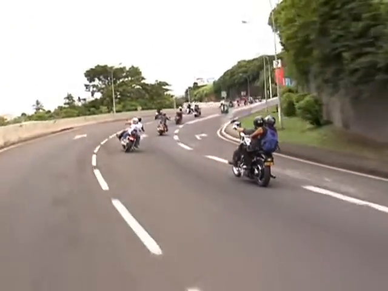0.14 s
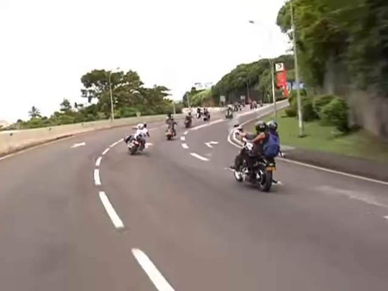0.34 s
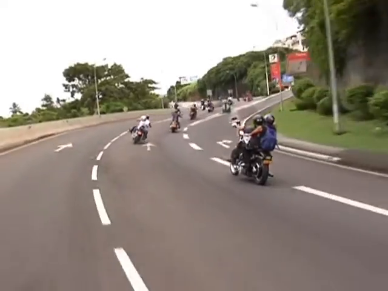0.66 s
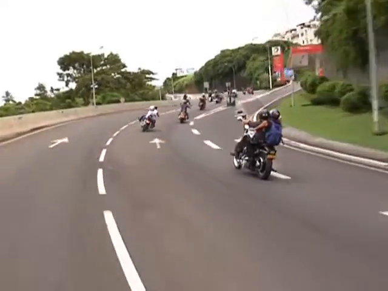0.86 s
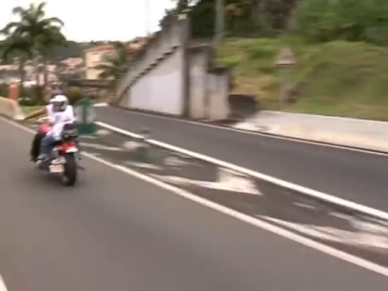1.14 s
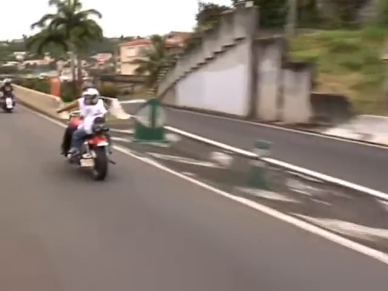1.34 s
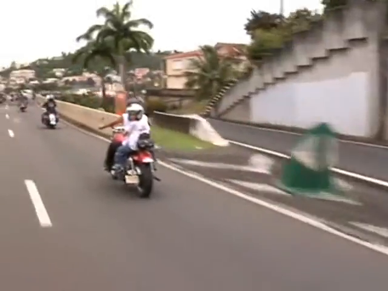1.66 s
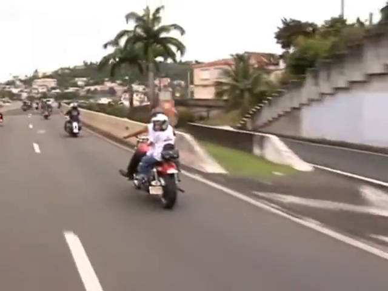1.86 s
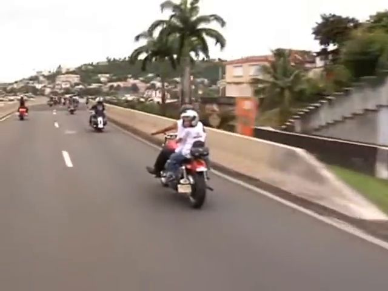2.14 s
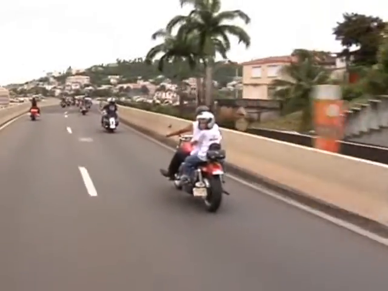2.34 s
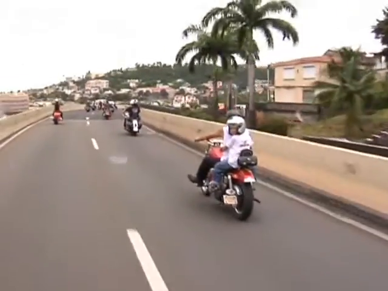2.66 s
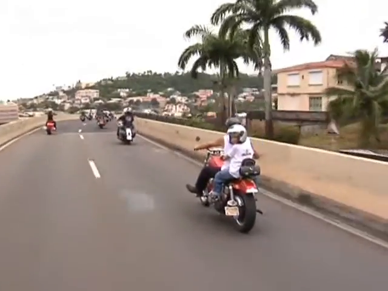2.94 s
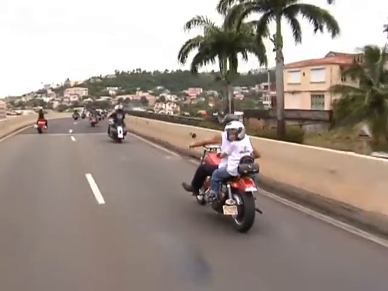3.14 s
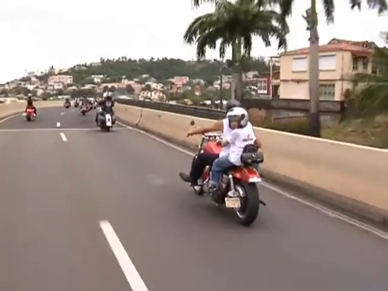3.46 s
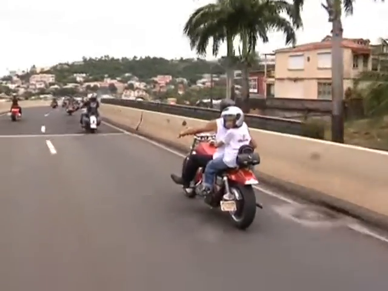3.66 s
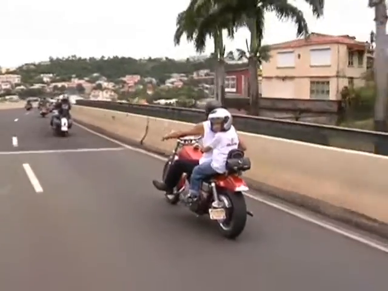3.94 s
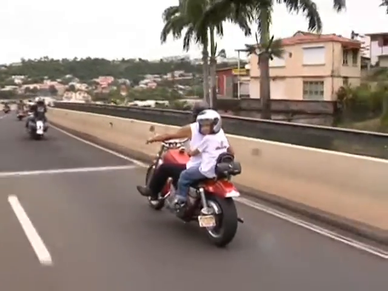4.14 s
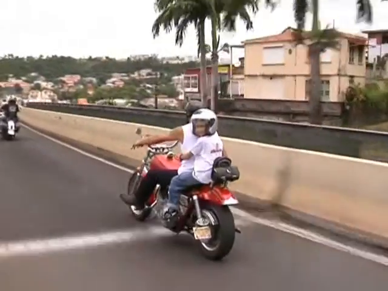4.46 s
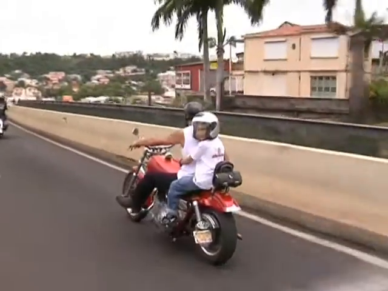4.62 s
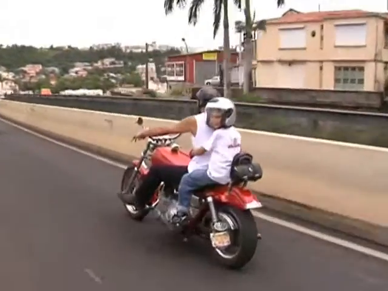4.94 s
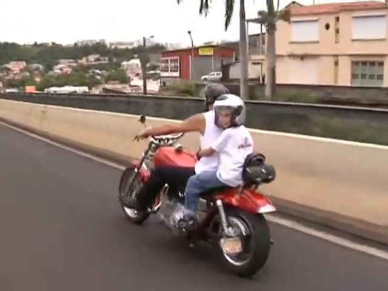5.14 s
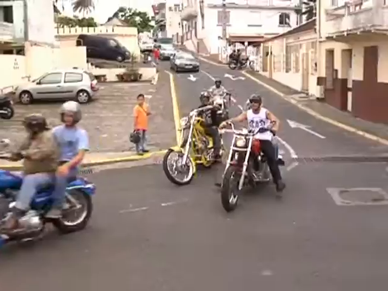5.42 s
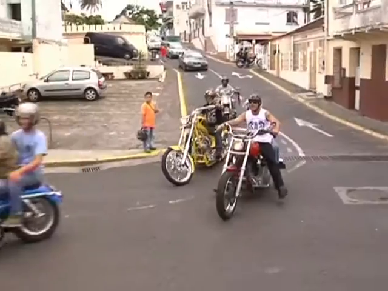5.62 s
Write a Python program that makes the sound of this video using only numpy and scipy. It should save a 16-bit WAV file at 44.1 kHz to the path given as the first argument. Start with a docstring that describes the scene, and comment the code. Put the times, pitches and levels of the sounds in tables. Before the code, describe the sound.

A motorcycle accelerates with a thumping exhaust, cutting to a softer rumble of cruising bikes and wind, then a brief idle.

```python
"""Dull exhaust thumps and their crack off a stone wall: a V-twin motorcycle pulls hard through a bend.
A hard cut drops us into a quiet group cruise, all low rumble, tyre hiss and wind on the microphone.
A second cut lands on engines ticking over at a junction. Each exhaust is a train of unevenly spaced
firings, part pressure pulse and part rushing gas. The bikes play in the right channel only."""
import sys
import numpy as np
from scipy import signal
from scipy.fft import rfft, irfft, next_fast_len
from scipy.io import wavfile
from scipy.ndimage import uniform_filter1d, map_coordinates

SR = 44100
rng = np.random.default_rng(int(sys.argv[2]) if len(sys.argv) > 2 else 0)


def log_audio(samples):
    """Write samples as a 16-bit WAV file to the path given in sys.argv[1]."""
    # one column per channel
    frames = np.atleast_2d(samples).T
    # limit to full scale, then quantise
    limited = np.clip(frames, -1, 1)
    pcm = np.round(limited * 32767).astype(np.int16)
    wavfile.write(sys.argv[1], SR, pcm)


N = 255337

# All levels are relative, ahead of the mix gains.
# wind buffet: (frequency [Hz], level [dB])
BUFFET_SPECTRUM = [(10, -47), (25, -3.5), (60, 1), (100, -1.5), (200, -9.5), (600, -39), (2000, -62)]
# brief low thuds during the cruise: (time [s], level [dB], pitch [Hz])
LOW_THUDS = [(1.241, -26.5, 146), (1.487, -23, 106), (1.852, -21.5, 87), (2.047, -23.5, 107),
             (2.212, -24, 106), (2.796, -28, 104), (2.969, -32, 110), (3.015, -32, 99), (3.154, -28, 94),
             (3.249, -24, 92), (3.307, -31, 102), (3.378, -26.5, 103), (3.699, -23, 112), (3.782, -48, 103),
             (4.081, -24.5, 112), (4.518, -30.4, 170), (4.627, -28, 114), (5.084, -25.5, 132),
             (5.369, -30, 147)]
# tyre hiss: (frequency [Hz], level [dB])
TYRE_SPECTRUM = [(530, -13.5), (900, -2), (1120, -4.5), (1510, -5), (2550, -10.5), (3700, -16.5),
                 (6130, -19.5), (8780, -34.5), (11400, -25), (15800, -59)]
# the clearest ticks of hiss: (time [s], level [dB])
HISS_TICKS = [(1.1977, -47.5), (1.36, -45), (1.4735, -49), (1.5963, -48.5), (1.9964, -52), (2.1321, -54),
              (2.4039, -48), (2.9527, -53), (3.0614, -52), (3.0949, -52.5), (3.2304, -51), (3.4396, -47.5),
              (3.7214, -50), (3.8641, -52), (4.0088, -48.5), (4.9482, -55), (5.1736, -52)]
# bed of idling engines: (frequency [Hz], level [dB])
IDLE_SPECTRUM = [(30, -30), (60, -7), (90, 10), (140, -5), (220, -7), (330, -5), (450, -16.5), (900, -25),
                 (1200, -26), (2500, -33.5), (6000, -39.5), (7500, -50), (12500, -41), (15800, -58)]
# valve ticks of the nearest idling engine, one per firing: (time [s], level [dB])
VALVE_TICKS = [(5.5014, -55), (5.533, -58), (5.5706, -54.5), (5.603, -60), (5.643, -56.5), (5.6757, -56),
               (5.7184, -51), (5.75, -56)]
# the cruising group, one row per bike: (engine cycle rate [Hz], level [dB])
GROUP_ENGINES = [(30.46, -0.5), (24.73, -3.5), (34.59, -1.5)]
# the group's exhaust rumble: (frequency [Hz], level [dB])
RUMBLE_SPECTRUM = [(30, -20), (65, -5.5), (92, -3.5), (125, 0.5), (155, -5), (185, -1), (260, -5),
                   (370, -9), (480, -20), (900, -23), (3000, -65)]
# the nearest cruising bike's burble: (frequency [Hz], level [dB])
BURBLE_SPECTRUM = [(90, -16), (180, -3), (400, 4), (520, 0), (700, -1), (880, -8), (1130, -11.5),
                   (1250, -12.5), (2500, -27.5), (6000, -40)]
# drawing up to that bike: (time [s], distance [m])
NEAR_DISTANCE = [(1.16, 9.8), (3.8, 6.6), (4.4, 6.5), (4.9, 3.47), (5.4, 3.37)]
# the cruising riders feather their throttles: (time [s], level [dB])
CRUISE_THROTTLE = [(1.16, 6.5), (1.3, 6.5), (1.48, 1.5), (1.88, 2.5), (2.25, -1), (3.75, -2.5), (4.3, .5),
                   (4.46, -1.5), (4.53, 2.5), (4.75, 0), (4.92, -3), (5.07, 0.2), (5.24, -1.5), (5.39, 1.2),
                   (5.48, -5.5)]
# the pulling bike's climbing revs: (time [s], engine cycle rate [Hz])
PULL_REVS = [(0, 26.02), (.22, 26.6), (.45, 27.36), (.62, 27.53), (.85, 28.2), (1.16, 28.66)]
# its exhaust's loudness: (time [s], level [dB])
PULL_LEVEL = [(0, -20), (.45, -20.5), (.65, -23), (.87, -23), (1.08, -21), (1.16, -25)]
# the dull body of a firing: (frequency [Hz], level [dB])
THUMP_SPECTRUM = [(25, -58), (90, -14), (190, 1.5), (330, 2.5), (500, -2.5), (700, -4.5), (950, -10.5),
                  (1150, -23), (1600, -20), (3000, -41), (8000, -47)]
# the bright edge of a firing: (frequency [Hz], level [dB])
CRACK_SPECTRUM = [(150, -23), (500, 5), (900, 4.5), (1200, 0), (2400, -3), (3400, -7.5), (4600, -11),
                  (5600, -13), (8000, -23.5), (12000, -22.5), (14000, -28), (16000, -46)]
# accents, where a firing burns harder or softer: (time [s], level [dB])
FIRING_ACCENTS = [(.137, -1.5), (.250, 1), (.509, 1.5), (.620, 3), (.654, 3), (.691, 1), (.727, 3.5),
                  (.777, 3), (.869, 1.5), (1.117, 2)]
# the echo, strongest when the pipes aim squarely at the wall: (time [s], level [dB])
WALL_ECHO_LEVEL = [(0, -12), (.35, -9), (.42, -3), (.525, 1), (.565, -7), (.62, -3.5), (.68, 2), (.76, -1),
                   (.84, 2), (.92, -1.5), (1.0, -11), (1.06, -15), (1.14, 0)]

CRUISE_CUT_S, JUNCTION_CUT_S = 1.161, 5.48
FIRING_GAP_CYCLES = .395  # from the first cylinder to the second


def amp(db):
    """Decibels to gain."""
    return np.exp(np.asarray(db) * (np.log(10) / 20))


def unit(x):
    """Scale to rms 1."""
    return x / np.sqrt(np.mean(x ** 2) + 1e-20)


def clock():
    """The time of each sample, in seconds."""
    return np.arange(N) / SR


def curve(rows):
    """An automation line through (time, value) points."""
    return np.interp(clock(), *np.transpose(rows))


def swell(at_s, width_s):
    """A smooth rise to 1 and fall, centred on a moment."""
    return np.exp(-np.minimum(((clock() - at_s) / width_s) ** 2, 20))


def wobble(rate):
    """A smooth random curve, rate knots a second."""
    steps = np.arange(0, N + 64, 64) / SR
    knots = rng.standard_normal(int(N * rate / SR) + 4)
    return np.interp(clock(), steps, map_coordinates(knots, [steps * rate]))


def noise():
    """White noise."""
    return rng.standard_normal(N)


def filtered(x, response):
    """x through a frequency response."""
    size = next_fast_len(N + SR // 2, real=True)
    return irfft(rfft(x, size) * response(np.fft.rfftfreq(size, 1 / SR)), size)[..., :N]


def colour(x, spectrum):
    """x through an EQ curve of (frequency, level) points, at rms 1."""
    points_hz, db = np.transpose(spectrum)
    return unit(filtered(x, lambda hz: amp(np.interp(np.log(hz + 1), np.log(points_hz), db))))


def resonate(x, hz, width_hz, stages=1):
    """x through a damped mode, once per stage."""
    return filtered(x, lambda f: (1j * f * width_hz / (hz ** 2 - f ** 2 + 1j * f * width_hz)) ** stages)


def delayed(x, ms):
    """x heard over a path whose delay may change."""
    return np.interp(clock() - ms / 1000, clock(), x, left=0)


def impulses(times, sizes):
    """One impulse at each time."""
    return np.bincount(np.round(np.abs(times) * SR).astype(int), sizes, N)[:N]


def pulses(times, scatter_db):
    """Impulses with a random scatter of strength."""
    return impulses(times, amp(scatter_db * np.clip(rng.standard_normal(len(times)), -2, 2)))


def puffs(train, rise_s, decay_s):
    """Each impulse lets out a burst of white noise that swells smoothly to its size and dies."""
    t = np.arange(SR // 10) / SR
    shape = (1 - np.exp(-t / rise_s)) ** 2 * np.exp(-t / decay_s)
    envelope = np.zeros(N + len(t))
    for start in np.flatnonzero(train):
        envelope[start:start + len(t)] += train[start] * shape
    return envelope[:N] / shape.max() * noise()


def ragged(x, depth_db=3.5):
    """Turbulence gives every burst its own mild, random peaks and dips of colour."""
    frames = signal.stft(x, nperseg=256)[2]
    field = rng.standard_normal(frames.shape)
    for axis in (0, 1):
        field = uniform_filter1d(field, size=5, axis=axis)
    frames = frames * amp(depth_db * np.tanh(unit(field)))
    return unit(signal.istft(frames, nperseg=256)[1][:N])


def extra_speed(ease_s):
    """The speed we shed as the cruise settles: 1 at its start, easing to 0."""
    return np.exp(-np.maximum(clock() - CRUISE_CUT_S, 0) / ease_s)


def wind():
    """Air buffets the microphone in lumps, harder with speed and in one gust, less in the slow bend."""
    gust_db = 2.5 * swell(at_s=3.1, width_s=.3)
    cruise_db = -43 + 7 * extra_speed(ease_s=.5) + gust_db
    level_db = np.where(clock() < CRUISE_CUT_S, -44, cruise_db)
    return amp(level_db) * unit(colour(noise(), BUFFET_SPECTRUM) * amp(.73 * wobble(6.8)))


def low_thuds():
    """Brief low thuds during the cruise, from wind or exhaust, each a push of a cycle or two."""
    phases = rng.uniform(0, 2 * np.pi, len(LOW_THUDS))
    return sum(amp(db - 6) * swell(at_s, width_s=.01) * np.cos(2 * np.pi * hz * (clock() - at_s) + phase)
               for (at_s, db, hz), phase in zip(LOW_THUDS, phases))


def tyres():
    """Tyres hiss on the asphalt, louder with speed."""
    level_db = -58.5 + 4.5 * extra_speed(ease_s=.63) + .79 * wobble(14)
    return amp(level_db) * colour(noise(), TYRE_SPECTRUM)


def rough_road():
    """A patch of coarse asphalt makes the tyres roar briefly, in lumps."""
    roar = unit(resonate(noise(), hz=830, width_hz=610, stages=2))
    return amp(-56.5 + 2.9 * wobble(24.87)) * swell(at_s=2.847, width_s=.18) * roar


def rattle(knocks_per_s=70):
    """Something loose shakes on the rough patch: a soft flurry of dry, uneven knocks."""
    beats = np.arange(int(knocks_per_s * N / SR))
    times = (beats + rng.uniform(0, .83, len(beats))) / knocks_per_s
    train = amp(-44.5) * swell(at_s=2.81, width_s=.075) * impulses(times, np.ones(len(beats)))
    return resonate(puffs(train, rise_s=.0005, decay_s=.0044), hz=1400, width_hz=1900)


def ticks(faint_per_s=7.7):
    """Scratchy ticks of hiss, with fainter ones at random between them."""
    times, db = np.transpose(HISS_TICKS)
    faint = pulses(rng.uniform(0, N / SR, int(faint_per_s * N / SR)), scatter_db=6)
    train = impulses(times - .003, amp(db - 4.5)) + amp(-63.5) * faint
    return resonate(puffs(train, rise_s=.0023, decay_s=.0084), hz=3000, width_hz=6200)


def silencer_drone():
    """A silencer passes the engine's third order as a wavering hum that swells in mid-cruise."""
    pitch_hz = 91.5 * (1 + .05 * wobble(14))
    level_db = -57.5 + 13 * swell(at_s=3.78, width_s=.52) + 4.5 * wobble(15)
    return amp(level_db) * unit(np.sin(2 * np.pi * np.cumsum(pitch_hz) / SR))


def bikes_ahead():
    """Further round the bend, the other exhausts blur into a roar and a rasp."""
    return amp(-36) * colour(noise(), RUMBLE_SPECTRUM) + amp(-42.5) * colour(noise(), CRACK_SPECTRUM)


def firings(cycle_hz, first_s):
    """Firing times of a V-twin, two unevenly spaced per engine cycle."""
    cycles = np.cumsum(cycle_hz) / SR
    marks = (np.arange(int(cycles[-1]) - 1)[:, None] + [0, FIRING_GAP_CYCLES]).ravel()
    return first_s + np.interp(marks, cycles, clock())


def exhaust(cycle_hz, spectrum, gas_gain=1.6):
    """An engine on a light throttle: wandering revs, uneven firings, part pulse and part rushing gas."""
    times = firings(cycle_hz * (1 + .012 * wobble(2)), first_s=rng.uniform(0, .03))
    train = pulses(times, scatter_db=2.5)
    gas = puffs(train, rise_s=.0015, decay_s=.013)
    return unit(colour(train, spectrum) + gas_gain * colour(gas, spectrum))


def idling_bikes():
    """Engines tick over; the nearest adds a soft exhaust beat and a valve tick for each firing."""
    times, tick_db = np.transpose(VALVE_TICKS)
    others = amp(-46.5) * exhaust(9.4, IDLE_SPECTRUM, gas_gain=2.4)
    mechanics = amp(-43.5) * colour(noise(), IDLE_SPECTRUM)
    taps = puffs(impulses(times, amp(tick_db)), rise_s=.0011, decay_s=.0036)
    valves = amp(2) * resonate(taps, hz=4200, width_hz=3700)
    beat = amp(2.5) * resonate(pulses(times, scatter_db=0), hz=170, width_hz=170, stages=2)
    return others + mechanics + valves + delayed(beat, ms=1.96)


def cruising_bikes():
    """The group blends into a rumble; the nearest bike burbles on top, its pipe ringing as we draw up."""
    closer_db = 20 * np.log10(8 / curve(NEAR_DISTANCE))  # 0 dB at 8 m
    group = unit(sum(amp(db) * exhaust(hz, RUMBLE_SPECTRUM) for hz, db in GROUP_ENGINES))
    near = unit(exhaust(30.5, BURBLE_SPECTRUM) * amp(1.1 * wobble(14)))
    rumble = amp(-41 + .33 * closer_db) * group
    burble = amp(-51.5 + closer_db) * near
    ring = amp(-80.5 + 3.2 * closer_db) * unit(resonate(near, hz=1054, width_hz=230, stages=2))
    # its silencer booms as we pass behind it
    boom = unit(resonate(near, hz=177, width_hz=51, stages=2))
    growl = amp(-45) * swell(at_s=4.5, width_s=.22) * boom
    return amp(curve(CRUISE_THROTTLE)) * (rumble + burble + ring + growl)


def kerb_echo(thump, times):
    """The kerb answers each firing ahead of the wall, with a faint thump and a narrow, ragged rasp."""
    gas = puffs(pulses(times, scatter_db=1.5), rise_s=.0007, decay_s=.001)
    rasp = ragged(resonate(gas, hz=2430, width_hz=1900, stages=2))
    return delayed(amp(-11.5) * thump + amp(-22.5) * rasp, ms=6.2 + .75 * clock())


def wall_crack(times, accent):
    """The bright crack of each firing, as rough stone returns it: mostly the mids."""
    # the first cylinder cracks harder than the second
    blows = pulses(times[::2], scatter_db=.8) + amp(-2) * pulses(times[1::2], scatter_db=.8)
    crack = colour(puffs(blows, rise_s=.0012, decay_s=.00088), CRACK_SPECTRUM)
    crack = accent * ragged(resonate(crack, hz=2700, width_hz=6200))
    # a hard firing steepens the crack and adds treble
    treble = filtered(crack, lambda hz: 3 * hz / (hz + 7000))
    return crack + amp(.5) * (1 - 1 / accent) * treble


def wall_echo(thump, crack):
    """The receding wall returns each firing a little later; its uneven face makes the note waver."""
    receding_ms = 7.7 * clock()
    bright = amp(-10) * delayed(crack, ms=11.6 + receding_ms)
    dull = amp(-7.5) * delayed(thump, ms=12.9 + receding_ms + .24 * wobble(22.35))
    return amp(curve(WALL_ECHO_LEVEL)) * (bright + dull)


def exhaust_thump(times, cycle_hz):
    """Each firing is a round pressure pulse; the pipe rings on after it, harder as the revs climb."""
    thump = -colour(pulses(times, scatter_db=-.5), THUMP_SPECTRUM)
    ring_db = -11.5 + 1.5 * (cycle_hz - cycle_hz[0])
    return unit(thump + amp(ring_db) * resonate(thump, hz=396, width_hz=83))


def pulling_bike():
    """Thumps with a spit of gas; the pipes aim at the wall, so its echo carries the bite."""
    cycle_hz = curve(PULL_REVS)
    times = firings(cycle_hz, first_s=.0217)
    accent = amp(sum(db * swell(at_s, width_s=.006) for at_s, db in FIRING_ACCENTS))
    thump = exhaust_thump(times, cycle_hz)
    gas = puffs(pulses(times, scatter_db=2), rise_s=.00055, decay_s=.0019)
    spit = amp(-15.5) * accent * ragged(colour(gas, CRACK_SPECTRUM))
    crack = wall_crack(times, accent)
    # bank and trees scatter each firing into a short wash
    scattered = pulses(times, scatter_db=2)
    wash = amp(-13) * colour(puffs(scattered, rise_s=.00087, decay_s=.0056), THUMP_SPECTRUM)
    sizzle = amp(-23) * colour(puffs(scattered, rise_s=.002, decay_s=.0021), CRACK_SPECTRUM)
    echoes = kerb_echo(thump, times) + wall_echo(thump, crack)
    return amp(curve(PULL_LEVEL) - 3.5) * (thump + spit + echoes + wash + sizzle)


def scene():
    """Bend, cruise and junction, cut end to end and panned hard right; the last cut clicks."""
    in_bend, stopped = clock() < CRUISE_CUT_S, clock() >= JUNCTION_CUT_S
    cruise = (cruising_bikes() + tyres() + silencer_drone() + ticks()
              + rattle() + rough_road() + low_thuds())
    moving = np.where(in_bend, pulling_bike() + bikes_ahead(), cruise) + wind()
    click = impulses([JUNCTION_CUT_S], [amp(-43)])
    right = np.where(stopped, idling_bikes(), moving) + click
    return np.array([np.zeros(N), 2 * right])


def record(dry):
    """A reflection in the microphone housing ripples the treble; peaks squash; both channels hiss."""
    rippled = filtered(dry, lambda hz: 1 - .3 * hz / (hz + 2500) * np.exp(-2j * np.pi * hz / 1770))
    squashed = rippled / (1 + np.abs(rippled / .58) ** 6) ** (1 / 6)
    hiss = amp(-83.5) * rng.standard_normal((2, N))
    # the input stage blocks the deepest bass and rolls off the very top
    low_cut = lambda hz: hz ** 2 / np.sqrt(hz ** 4 + 14 ** 4)
    high_cut = lambda hz: (hz < 15850) / np.sqrt(1 + (hz / 14800) ** 24)
    return filtered(squashed + hiss, lambda hz: low_cut(hz) * high_cut(hz))


dry = scene()
out = record(dry)
log_audio(out)
```